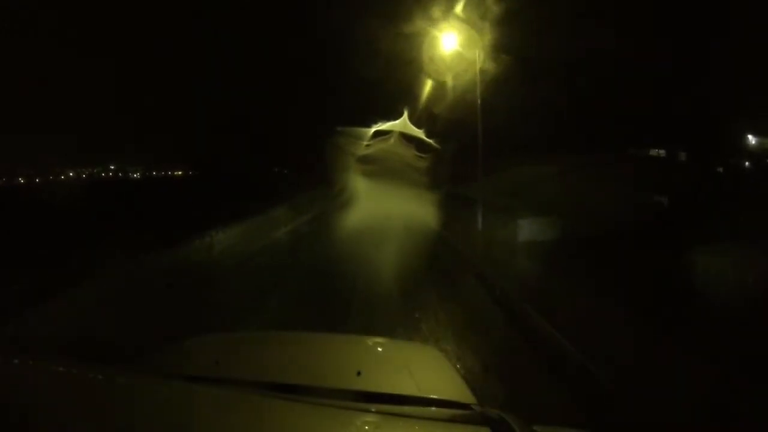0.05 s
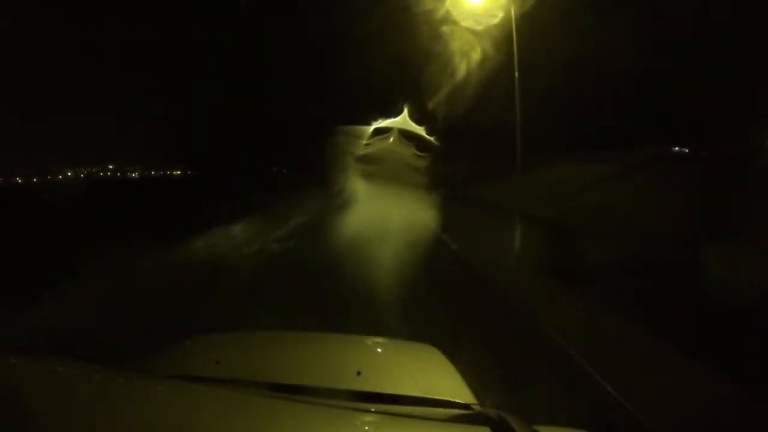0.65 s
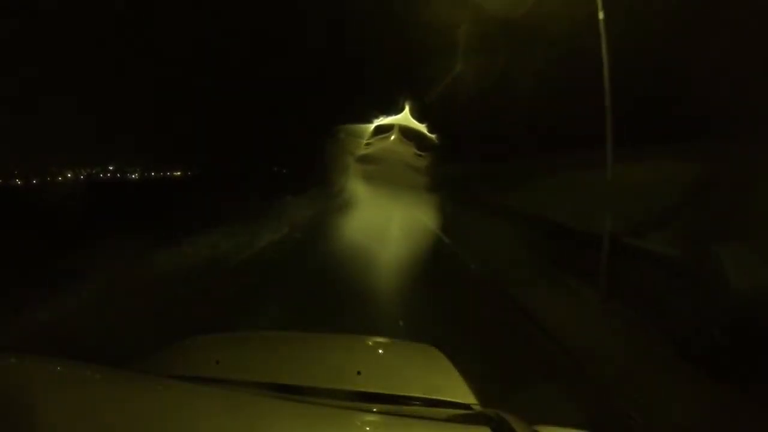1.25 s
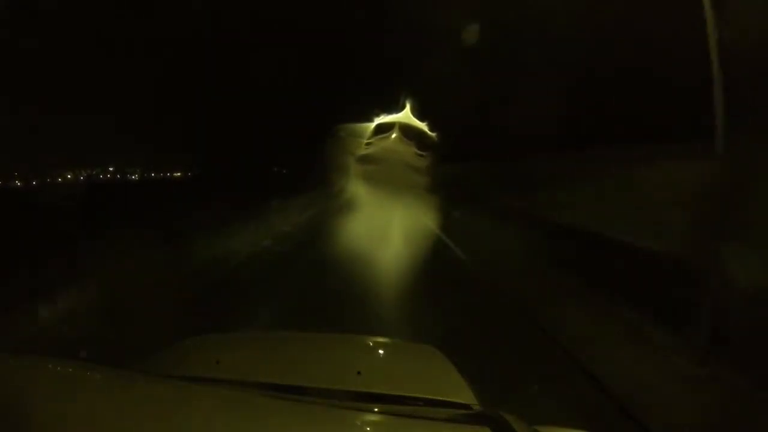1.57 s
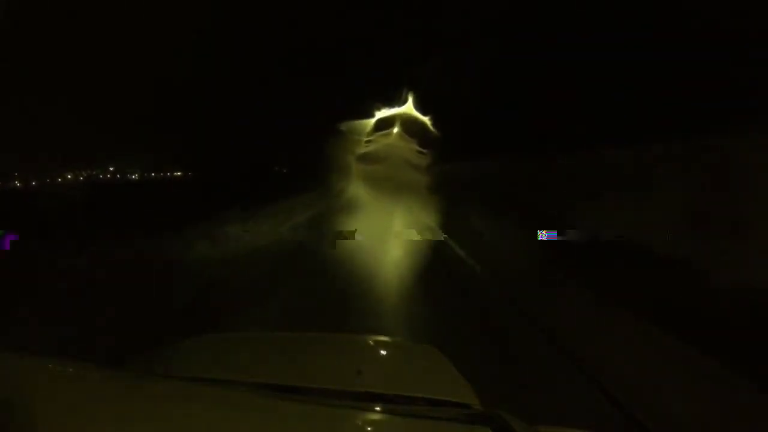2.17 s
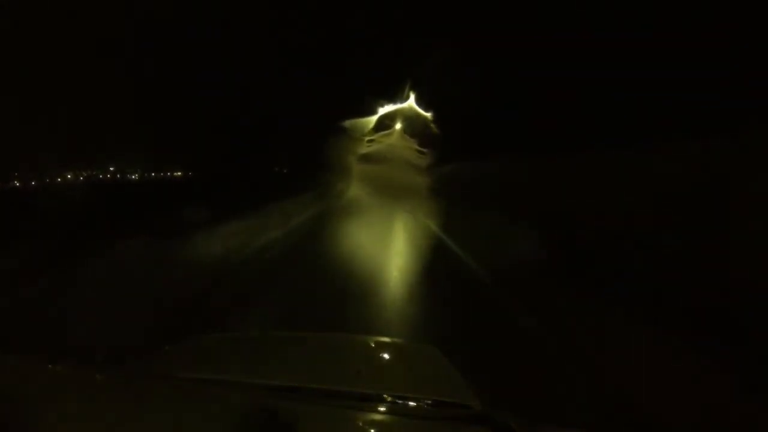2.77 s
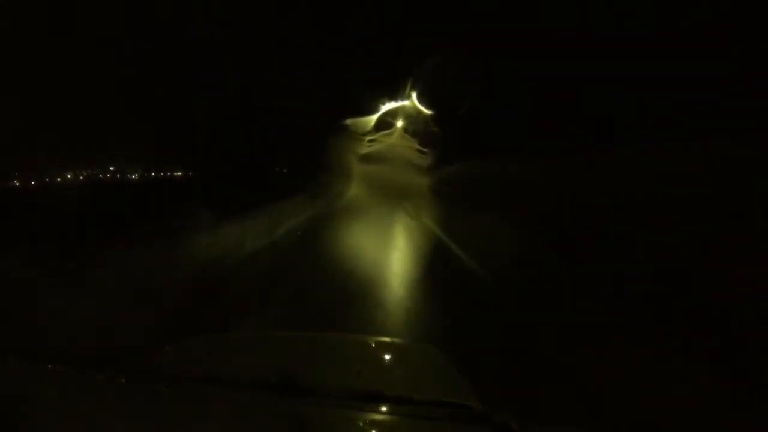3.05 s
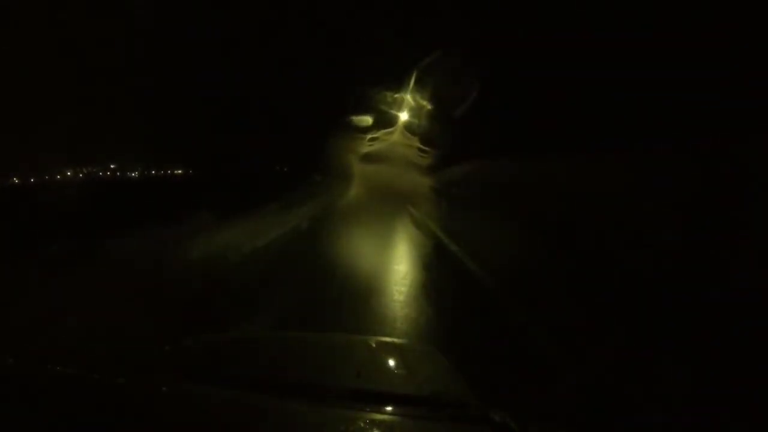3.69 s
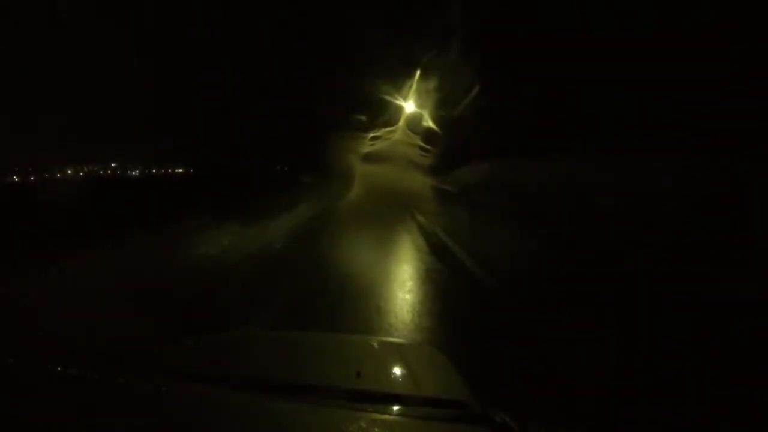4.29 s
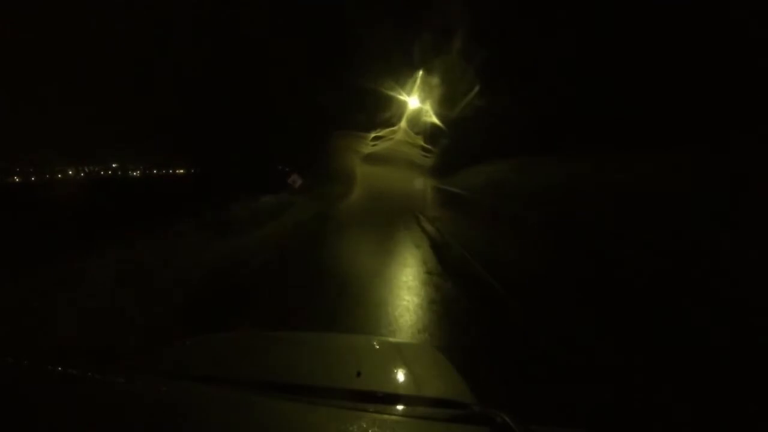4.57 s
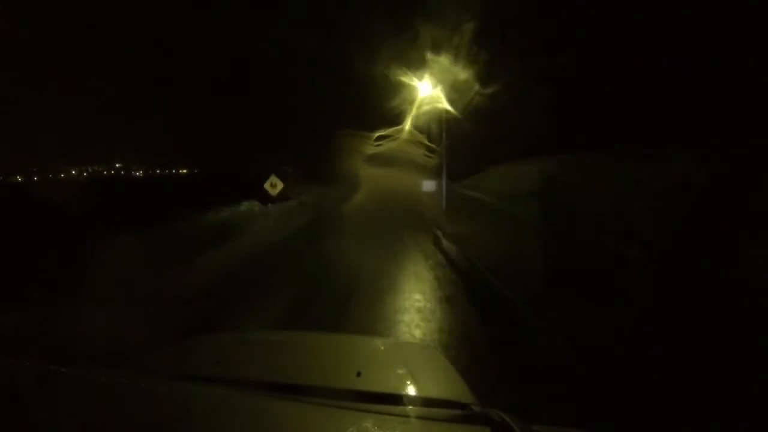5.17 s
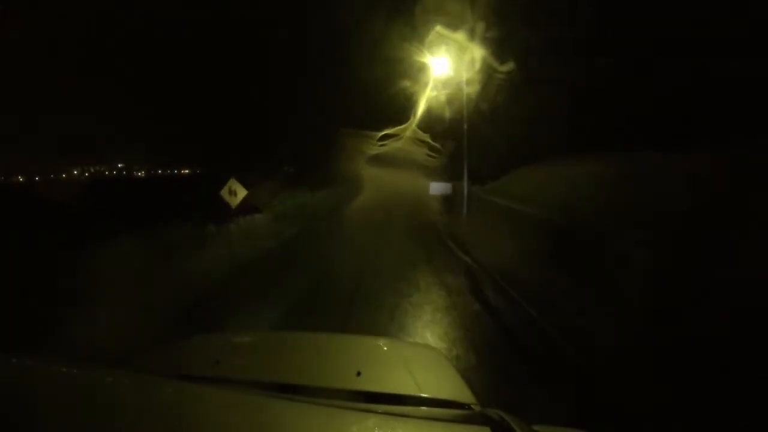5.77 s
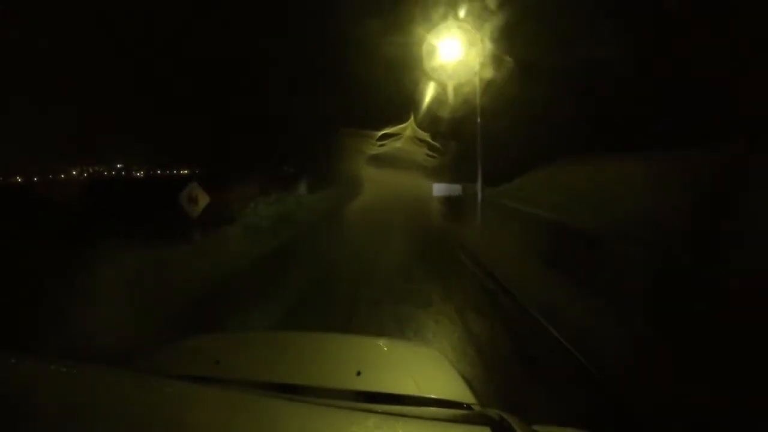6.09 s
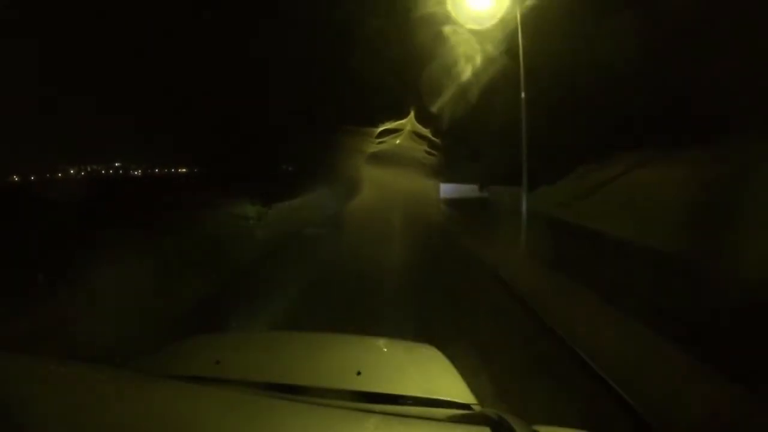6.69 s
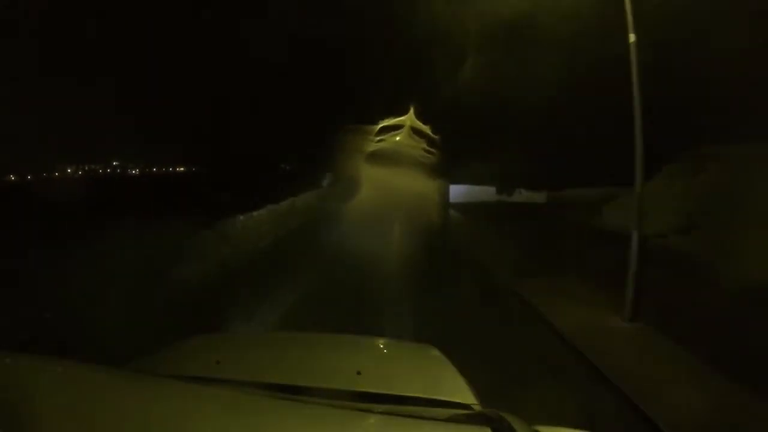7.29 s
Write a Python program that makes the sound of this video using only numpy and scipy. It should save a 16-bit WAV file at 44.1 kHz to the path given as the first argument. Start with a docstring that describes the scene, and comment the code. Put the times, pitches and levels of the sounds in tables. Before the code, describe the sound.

A car drives along a flooded road, heard from a microphone behind the windscreen. The engine drones low over a deep road rumble, while water churns under the floor and tyre spray hisses faintly outside. For the first three seconds, drops hit the glass in flurries of sharp ticks. They then thin to occasional taps as the engine speeds up slightly and eases. The cabin booms in deep swells throughout.

```python
"""A car in floodwater at night, on one microphone inside the cabin, behind the windscreen.
From the start the engine drones, water churns under the floor and spray from the tyres hisses outside.
For three seconds drops strike the glass in flurries, each a sharp tick that rings a few milliseconds.
Then they thin out and a body panel hums now and again; the engine gathers speed until about 5 s and eases.
To the end the cabin booms in deep swells, and the recorder's gain control ducks the rest under them."""
import sys
import numpy as np
from scipy import signal
from scipy.fft import rfft, irfft, next_fast_len
from scipy.io import wavfile
from scipy.ndimage import uniform_filter1d, minimum_filter1d, map_coordinates

SR = 44100
rng = np.random.default_rng(int(sys.argv[2]) if len(sys.argv) > 2 else 0)


def to_wav(sig):
    """Store sig (one row per channel, or 1-D mono) as 16-bit WAV at the path in sys.argv[1].

    Samples outside -1..1 are clipped; the rate is SR.
    """
    pcm = np.clip(np.atleast_2d(sig), -1, 1) * 32767
    pcm = np.round(pcm).astype(np.int16)
    wavfile.write(sys.argv[1], SR, pcm.T)  # frames by channels


N = 332506
TIME_S = np.arange(N) / SR


# Big drops on the windscreen, just ahead of the microphone; levels are relative:
# start_s, level_db, ring_hz, knock_hz, knock_db, bright_db
BIG_DROPS = [(.2321, -26.5, 3140, 1400, 7, 4), (.2991, -14.5, 3550, 1000, -8, -0.5),
             (.3856, -19.5, 3450, 1400, -6, 2), (.4103, -16.5, 2650, 1410, -17, -6),
             (.4449, -30, 3530, 1400, 0, 13), (.4766, -26, 2820, 1400, 7, 14),
             (.489, -16.5, 3540, 1400, -6, 2.5), (.5492, -15.5, 2930, 1400, -11, 4),
             (.583, -27.5, 3130, 1400, 1, 0), (.963, -25, 3260, 1400, -11, 1),
             (.9781, -23.5, 2880, 1400, 5, 10), (1.0328, -26.5, 3020, 1400, -13, -9),
             (1.0754, -7, 2450, 1050, 9.5, 9.5), (1.1315, -24.5, 3060, 1400, 2, 8),
             (1.3103, -23.5, 3230, 1400, -10, 6), (1.3473, -20, 3480, 1310, 11.5, 7),
             (1.6025, -30.5, 3560, 1400, 2, 6), (1.6518, -3.5, 2680, 1150, -7, 1.5),
             (1.681, -29, 3450, 1400, -14, 8), (1.6879, -21, 3470, 1400, 4, 6),
             (1.6951, 7.5, 3580, 900, -7, -2), (1.7038, -13, 3230, 1490, 18, -4),
             (1.725, -23, 3500, 1400, -8, 3), (1.7475, -30, 3400, 1400, -6, 4),
             (1.762, -26, 3400, 1400, -4, 8), (1.8203, -4.5, 2920, 1200, -5.5, -2.5),
             (1.832, -26, 3400, 1400, -10, 7), (1.8813, -16.5, 3500, 1400, .5, 6),
             (1.9561, -15.5, 3480, 1390, 7.5, 2.5), (1.968, -22, 3240, 1400, 2, 12),
             (1.9807, -10.5, 3670, 1400, -12, 6), (1.9918, -14, 3360, 1400, 1, 8),
             (2.029, -29, 3500, 1400, -8, 5), (2.0353, -21, 3530, 1400, -14, 4),
             (2.2274, -17, 3530, 1410, -17, 5.5), (2.2524, -22, 3600, 1400, 1, 7.5),
             (2.272, -30, 3500, 1400, -6, 21), (2.291, -33, 3500, 1400, -8, 18),
             (2.3728, -32.5, 3360, 1400, 14, 12), (2.4485, -22.5, 3450, 1400, 1, -3),
             (2.506, -29.5, 3460, 1400, -13, 13), (2.556, -32, 3400, 1400, -6, 7),
             (2.581, -15, 3640, 1400, -1, 3), (2.6014, -11.5, 2950, 1600, 13, 3),
             (2.641, -10.5, 3570, 1400, -1.5, 1.5), (2.6458, -24, 3870, 1400, -8, 3),
             (2.676, -20.5, 3240, 1400, -9, 3), (2.7099, -30, 3120, 1400, -9, -6),
             (2.7178, -29.5, 3060, 1400, -1, -6), (2.7456, -32, 3500, 1400, -8, 3),
             (2.7582, -15, 3280, 1370, -3, 3.5), (2.7973, -27, 3170, 1400, -15, 9),
             (2.8556, -23, 2940, 1400, -19, 7.5), (2.9756, -33.5, 3400, 1400, 0, 9),
             (3.0223, -18, 3240, 1400, 3.5, 2), (3.0539, -25.5, 3638, 1400, -8, 5),
             (3.142, -21.5, 3800, 1400, 0, -3.5), (3.199, -24.5, 3000, 1400, 3, -5),
             (3.8572, -23, 2540, 930, 25, 1.5), (4.0495, -15.5, 4350, 1240, 6, -1),
             (4.1419, -29.5, 3600, 1400, -20, 2), (4.4298, -10.5, 3690, 780, 6.5, -6.5),
             (4.7465, -31, 3637, 1300, 8, 5.5), (4.8072, -31, 3780, 1400, 15, 0),
             (4.9324, -35, 3730, 1400, 0, 4), (5.132, -26, 2830, 1400, 3, -13),
             (6.0115, -33, 3620, 1400, -9, 0), (6.0417, -30.5, 3150, 1400, 20, 8),
             (6.9046, -29, 3570, 1400, 1, 2), (7.1197, -23, 2470, 1395, -3, -1),
             (7.1733, -18.5, 3700, 1350, 14.5, -3), (7.4849, -9, 3590, 1600, -12, 2),
             (7.5227, -27, 3450, 1409, -2, -1)]

def big_drops(gain_db=1.27):
    """Single drops of thrown water hit the pane and stand out from the patter."""
    return amp(gain_db) * glass_ticks(BIG_DROPS)


# Spectrum of a drop on the windscreen, from inside: frequency_hz, level_db
GLASS_SPECTRUM = [(150, -32), (520, -20.5), (960, -21.5), (1200, -9.5), (1420, -4), (2000, -9), (3400, -6),
                  (4400, -9.5), (5200, -7.5), (6300, -16), (7500, -15), (8600, -32.5), (12000, -43),
                  (16000, -61)]

def glass_ticks(drops, ring_db=10.5, ring_width_hz=540, mode_hz=3600, splash_s=0.0012, bend_s=0.0004):
    """Each drop knocks on the pane and sets it ringing briefly; rows as in BIG_DROPS."""
    start_s, level_db, ring_hz, knock_hz, knock_db, bright_db = np.transpose(drops)[:, :, None]
    size = 1024
    f, t = np.fft.rfftfreq(size, 1 / SR), np.arange(size) / SR
    above = lambda edge_hz: 1 - 1 / (1 + (f / edge_hz) ** 20)
    # where a drop lands sets the ring: the further from the pane's main mode, the broader and drier
    width_hz = ring_width_hz + 1.47 * np.abs(ring_hz - mode_hz)
    colour_db = along(GLASS_SPECTRUM, f) + ring_db * resonance(f, ring_hz, width_hz)
    # heavy drops knock low, fast small ones are bright, and only hard ones crack in the top octave
    colour_db += knock_db * resonance(f, knock_hz, width_hz=760) + bright_db * above(4570)
    colour_db += 0.2 * (level_db + 18) * above(11000)
    cepstrum = irfft(np.log(amp(colour_db)))
    pane = np.exp(rfft(2 * cepstrum[:, :size // 2], size))  # minimum phase: a sharp attack, then decay
    # bending waves in the pane: the highs arrive first, 1 kHz after bend_s
    pane *= np.exp(-4j * np.pi * bend_s * np.sqrt(1000 * f))
    # the impact, then the brief patter of the drop breaking up
    contact = (t == 0) + 0.18 * np.exp(-t / splash_s) * rng.standard_normal((len(drops), size))
    tick = irfft(pane * rfft(contact))
    tick /= np.sqrt(np.sum(tick ** 2, axis=1, keepdims=True) / (.003 * SR))  # energy of 3 ms at rms 1
    return placed(start_s, amp(level_db) * tick)


# Flurries reaching the windscreen: centre_s, spread_s, peak_density (times that of the stray droplets)
DROPLET_FLURRIES = [(.45, .06, 20), (0.721, .05, 5), (1.451, .25, 2.5), (1.75, .05, 34), (2.0, .04, 36),
                    (2.28, .045, 40), (2.701, .15, 13), (7.05, .25, 2)]

def flurry_density():
    """How thickly droplets reach the glass: 1 between the flurries, each of which swells and fades."""
    return 1 + sum(peak * np.exp(-.5 * ((TIME_S - centre_s) / spread_s) ** 2)
                   for centre_s, spread_s, peak in DROPLET_FLURRIES)


def flurry_times(count):
    """Random times, crowded where the flurries are thick; neighbours stray into clumps."""
    share = np.cumsum(flurry_density())
    turn = (np.arange(count) + .5 + .5 * rng.standard_normal(count)) / count
    return np.searchsorted(share / share[-1], turn % 1) / SR


def droplets(base_db=-46, growth_db=6, spread_db=4.8, ring_hz=3400, knock_hz=1400):
    """Fine droplets patter on the glass; a flurry ten times as thick makes each growth_db louder."""
    start_s = flurry_times(count=300)
    size, place, knock, bright = rng.standard_normal((len(start_s), 4)).T
    density = np.interp(start_s, TIME_S, flurry_density())
    level_db = base_db + growth_db * np.log10(density) + spread_db * np.minimum(size, 1.2)
    tuning = np.exp(0.087 * place)
    knock_db, bright_db = 5 * knock - 3, 2 + 3.5 * bright
    drops = np.column_stack([start_s, level_db, ring_hz * tuning, knock_hz * tuning, knock_db, bright_db])
    return glass_ticks(drops)


# Spray outside, with the glass between it and the microphone: frequency_hz, relative_db
SPRAY_SPECTRUM = [(250, -28.5), (550, -8), (900, -15), (1450, 2.5), (2150, -3.5), (2500, -0.5),
                  (3400, -2.5), (5000, -7), (6200, -13), (7600, -15), (9000, -30), (11500, -34.5),
                  (14000, -51), (16000, -65.5)]
# How much water the tyres throw up: time_s, relative_db
SPRAY_AMOUNT = [(0.0, -5), (0.9, -3), (1.18, 1.5), (1.57, 0.4), (2.3, -2.5), (2.41, -3.5), (3.67, -0.7),
                (4.24, 0), (5.02, -3), (6.52, -2), (6.64, 0.5), (7.18, 1.5), (7.54, -1.5)]

def spray(level_db=-43):
    """Sheets of water from the tyres hiss through the glass and its resonance; more water, more hiss."""
    def colour_db(f):
        return along(SPRAY_SPECTRUM, f) + 7 * resonance(f, 3640, 450) - 5 * resonance(f, 4260, 300)
    flutter_db = .5 * wobble(15) + 2 * wobble(350)
    return amp(level_db + curves(SPRAY_AMOUNT)[0] + flutter_db) * rush(colour_db, patchy_db=1.07)


def plops():
    """Thrown water patters dully out in the wheel arches and plinks close by on the wet glass."""
    arch_s = rng.random(size=900) * N / SR
    arches = bubbles(arch_s, level_db=-37.5, spread_db=5, centre_hz=900, scatter=0.4, cycles=1.1)
    glass_s = flurry_times(count=45)
    plinks = bubbles(glass_s, level_db=-36.5, spread_db=5.5, centre_hz=2590, scatter=0.2, cycles=5.3)
    return arches + plinks


def bubbles(start_s, level_db, spread_db, centre_hz, scatter, cycles, rise=0.13):
    """Short bubbles start softly, rise in pitch and die away over the given number of cycles."""
    size, pitch = rng.standard_normal((len(start_s), 2)).T[:, :, None]
    pitch_hz = centre_hz * np.exp(scatter * np.clip(pitch, -1.5, 1.5))
    turns = pitch_hz * np.arange(SR // 40) / SR
    age = turns / cycles
    tone = np.sin(2 * np.pi * turns * (1 + rise * np.tanh(age / 2)))
    envelope = np.exp(-age) * (1 - np.exp(-2 * turns))
    gain = amp(level_db + spread_db * np.minimum(size, 1.7)) * np.sqrt(pitch_hz / centre_hz)
    return placed(start_s[:, None], gain * envelope * tone)


# Swells of the boom, all around the microphone: time_s, relative_db
BOOM_SWELLS = [(0.0, -13), (0.15, -7.5), (0.49, -21.5), (0.82, -7.5), (1.03, -17.5), (1.56, -16),
               (2.13, -4.5), (2.78, -17), (2.86, -7.5), (3.27, -15), (3.62, -10.7), (3.82, -19.5),
               (4.22, -17), (4.84, -5), (5.45, -14.5), (5.57, -36), (5.68, -10), (6.52, -6.5), (6.59, -14),
               (7.0, -21), (7.16, -11), (7.54, -22)]

def cabin_boom(boom_hz=26.92, gain_db=-3):
    """The body and the air inside it boom at one low resonance."""
    phase = 2 * np.pi * boom_hz * TIME_S + 0.47 * wobble(4.7)
    return amp(curves(BOOM_SWELLS)[0] + gain_db) * unit(np.sin(phase))


# The engine, from the cabin, gathering speed and easing off: time_s, firing_hz, load_db
ENGINE_RUN = [(0, 56.66, -1.5), (2.4, 60.55, -1.5), (2.8, 61.39, 2), (4, 64.07, 1), (4.8, 65.44, 0),
              (5.5, 65.18, 1.5), (6.3, 65.16, 0.5), (7.54, 64.1, 0.5)]
# Its overtones: firing_multiple, relative_db
ENGINE_OVERTONES = [(2, -32.5), (3, -27.5), (4, -32), (5, -37), (7, -42.5)]

def engine(level_db=-23.5, waver_db=3, whine_db=-32, whine_multiple=7.5):
    """The firing note, its weak overtones and a whine that sweeps through a body resonance."""
    firing_hz, load_db = curves(ENGINE_RUN)
    phase = 2 * np.pi * np.cumsum(firing_hz) / SR
    note = np.sin(phase) * amp(.8 * wobble(11))
    for multiple, overtone_db in ENGINE_OVERTONES:
        note += amp(overtone_db + waver_db * wobble(7)) * np.sin(multiple * phase + .5 * wobble(11))
    body = resonance(whine_multiple * firing_hz, centre_hz=455, width_hz=45)
    whine = body * np.sin(whine_multiple * phase + wobble(14))
    return amp(level_db + load_db) * unit(note + amp(whine_db) * whine)


# Water through the floor, below the microphone: frequency_hz, relative_db
FLOOR_SPECTRUM = [(60, -21), (110, -12), (138, -2.5), (155, 6), (210, -0.5), (300, -5), (350, -3.5),
                  (420, -14.5), (460, -9), (540, -21), (1200, -31)]
# How hard it washes against the floor pan: time_s, relative_db
FLOOR_WASH = [(0, -0.5), (1.2, 0.5), (2.3, 0), (3.6, 0), (4.2, -1), (5.6, -0.5), (6.8, -2.5), (7.54, -1)]
# Swells of a body panel's hum: time_s, level_db
PANEL_SWELLS = [(0, -55), (.6, -45.5), (1.2, -48.5), (2.3, -49), (2.7, -41.5), (3.0, -48.5), (3.6, -38),
                (3.88, -43), (4.0, -51.5), (5.42, -51.5), (5.6, -42), (5.75, -50), (6.5, -50), (7.0, -43),
                (7.16, -51), (7.4, -39), (7.54, -52)]

def underbody(churn_db=-40, panel_hz=254.1):
    """Water churns against the floor pan; a body panel hums in swells at its resonance."""
    churn = rush(lambda f: along(FLOOR_SPECTRUM, f) - 20 * np.log10(1 + (f / 1500) ** 4), patchy_db=1)
    waver = amp(2.2 * wobble(16))
    hum = unit(waver * np.sin(2 * np.pi * panel_hz * TIME_S + 1.05 * wobble(16)))
    wash_db = churn_db + curves(FLOOR_WASH)[0] + wobble(22)
    return amp(wash_db) * churn + amp(curves(PANEL_SWELLS)[0]) * hum


# The road, coming up through the suspension: frequency_hz, relative_db
ROAD_SPECTRUM = [(5, -13), (17, -2.5), (32, 7.5), (41, 0.5), (52, -13.5), (73, 0), (88, -21.5), (125, -24),
                 (200, -53.5)]

def road_rumble(level_db=-24.5):
    """The flooded road shakes the body with a steady rumble."""
    response = lambda f: amp(along(ROAD_SPECTRUM, f)) / (1 + (f / 250) ** 4)
    return amp(level_db) * unit(filtered(rng.standard_normal(N), response))


def amp(db):
    """Decibels to gain."""
    return 10 ** (np.asarray(db) / 20)


def unit(x):
    """Scale to rms 1."""
    return x / np.sqrt(np.mean(x ** 2) + 1e-20)


def along(spectrum, hz):
    """A spectrum's level in dB at hz, read on a log frequency axis."""
    frequency_hz, level_db = np.transpose(spectrum)
    return np.interp(np.log(hz + 1), np.log(frequency_hz + 1), level_db)


def curves(rows):
    """One value per sample for each column after the time."""
    time_s, *columns = np.transpose(rows)
    return [np.interp(TIME_S, time_s, column) for column in columns]


def wobble(rate_hz):
    """A smooth random curve, rate_hz knots a second."""
    return map_coordinates(rng.standard_normal(int(N * rate_hz / SR) + 4), [TIME_S * rate_hz])


def filtered(x, response):
    """Filter x by a gain given as a function of frequency."""
    size = next_fast_len(N + SR // 2)
    return irfft(rfft(x, size) * response(np.fft.rfftfreq(size, 1 / SR)), size)[:N]


def resonance(f, centre_hz, width_hz):
    """A resonance curve of height 1."""
    return 1 / (1 + (2 * (f - centre_hz) / width_hz) ** 2)


def rush(colour_db, patchy_db):
    """Coloured noise of rms 1 with patches of random gain in time and frequency."""
    spectra = signal.stft(rng.standard_normal(N), nperseg=512)[2]
    patches = uniform_filter1d(rng.standard_normal(spectra.shape), size=7, axis=0)
    patches = uniform_filter1d(patches, size=8, axis=1)
    noise = signal.istft(spectra * amp(patchy_db * unit(patches)), nperseg=512)[1][:N]
    return unit(filtered(noise, lambda f: amp(colour_db(f))))


def placed(start_s, sounds):
    """Sum of short sounds, one per row, each starting at its time."""
    at = np.abs(np.round(start_s * SR)).astype(int) + np.arange(sounds.shape[1])
    return np.bincount(at.ravel(), sounds.ravel(), N)[:N]


def scene():
    """Everything as it reaches the one microphone behind the windscreen."""
    water = underbody() + spray() + plops() + droplets() + big_drops()
    return (cabin_boom() + road_rumble() + engine() + water)[None]


def gain_control(x, threshold_db=-12, squeeze=0.98, reaction_s=0.022, knee=3):
    """The recorder turns down as peak power, averaged over the reaction time, passes a soft threshold."""
    keep = np.exp(-1 / (reaction_s * SR))
    opening_power = np.mean(2 * x[:SR // 10] ** 2)
    power = signal.lfilter([1 - keep], [1, -keep], 2 * x ** 2, zi=[opening_power])[0]
    excess_db = 10 / knee * np.log10(1 + (power / amp(threshold_db) ** 2) ** knee)
    return x * amp(-squeeze * excess_db)


def record(dry, top_hz=16000):
    """Gain control, a fast limiter that holds the hardest drops at full scale, then a steep band limit."""
    ducked = gain_control(dry[0])
    needed_gain = 1 / np.maximum(np.abs(ducked), 1)
    limiter_gain = uniform_filter1d(minimum_filter1d(needed_gain, size=9), size=9)
    return filtered(ducked * limiter_gain, lambda f: 1 / (1 + (f / top_hz) ** 80))[None]


dry = scene()
out = record(dry)
to_wav(out)
```